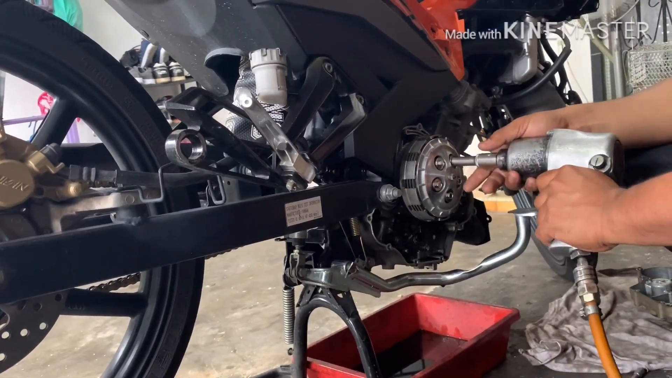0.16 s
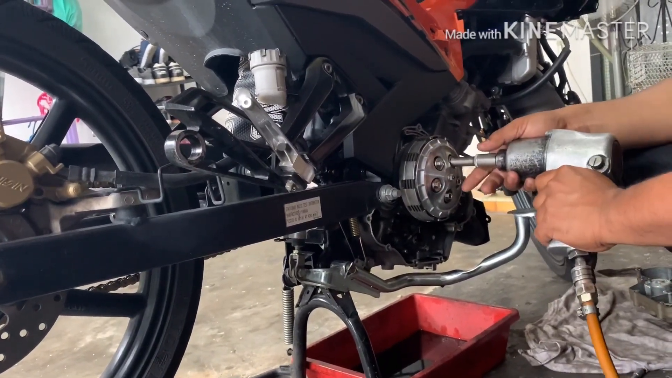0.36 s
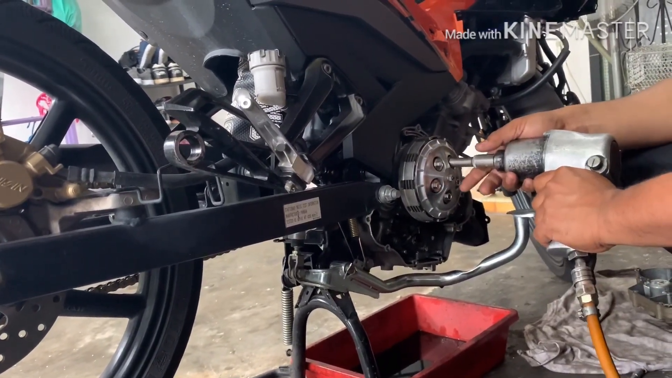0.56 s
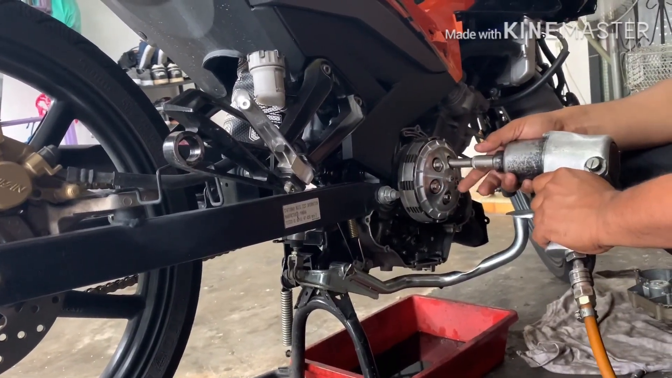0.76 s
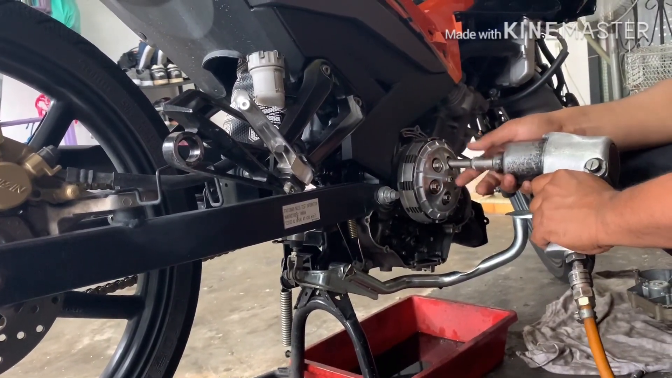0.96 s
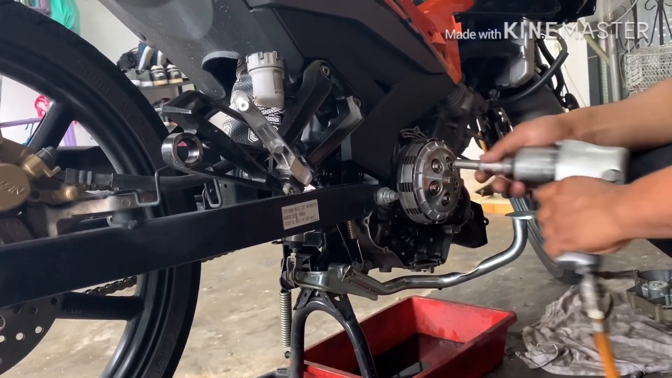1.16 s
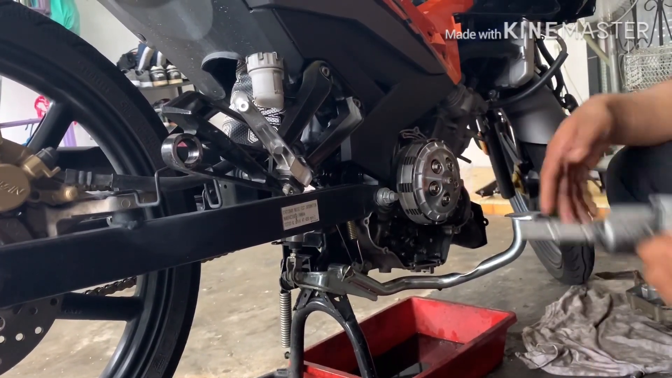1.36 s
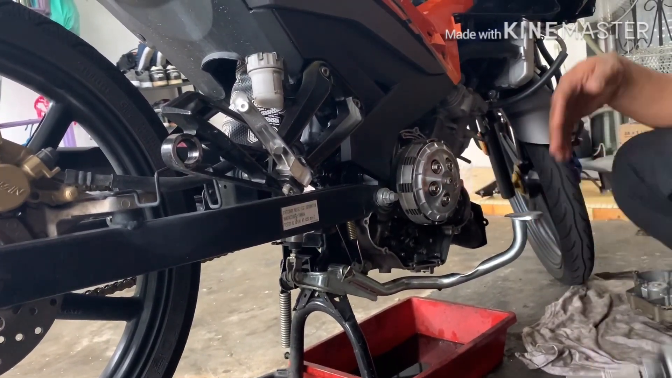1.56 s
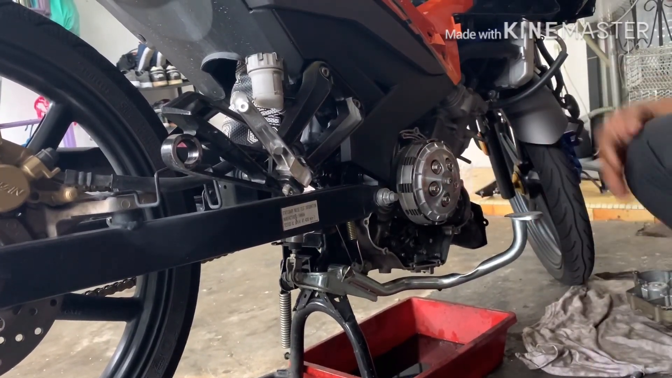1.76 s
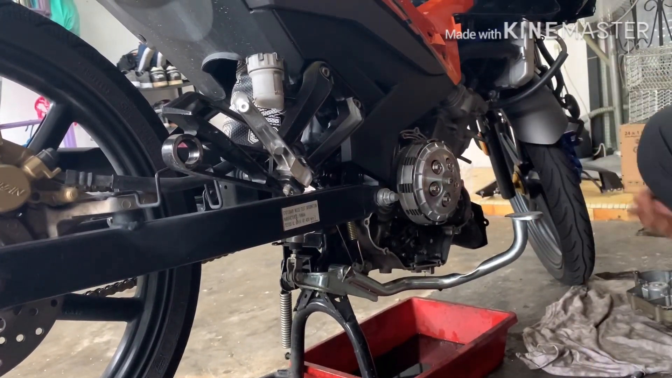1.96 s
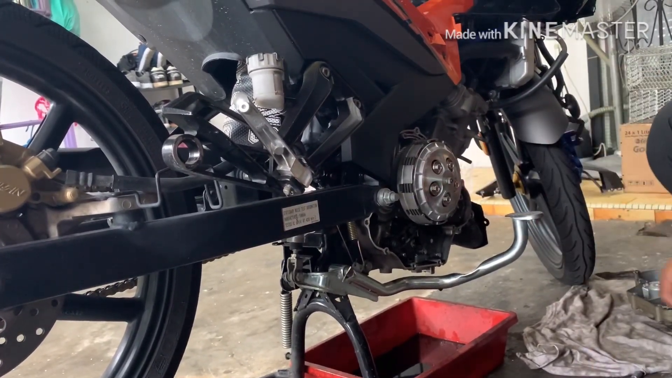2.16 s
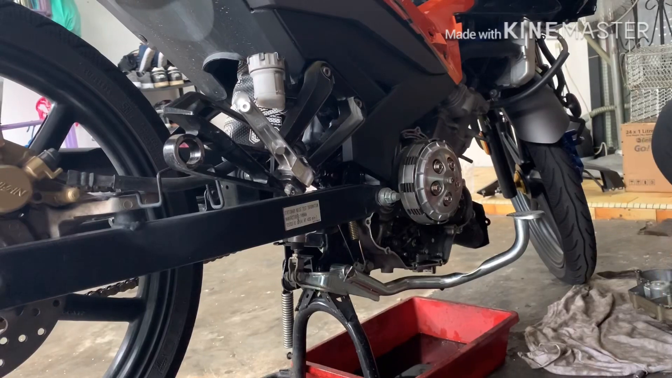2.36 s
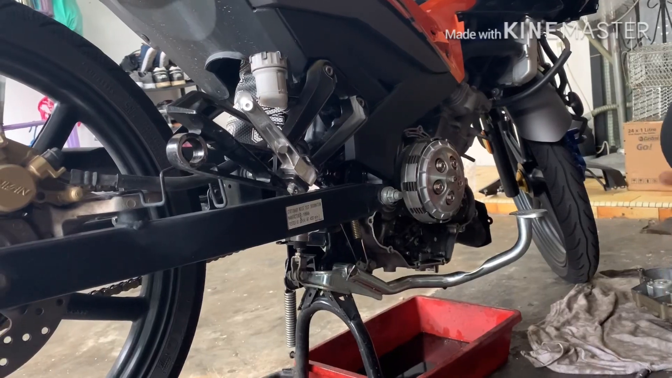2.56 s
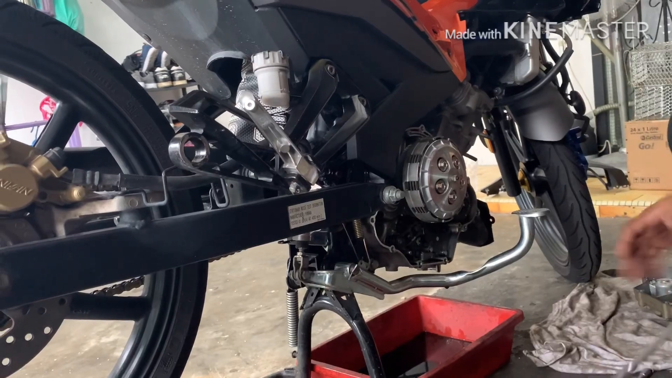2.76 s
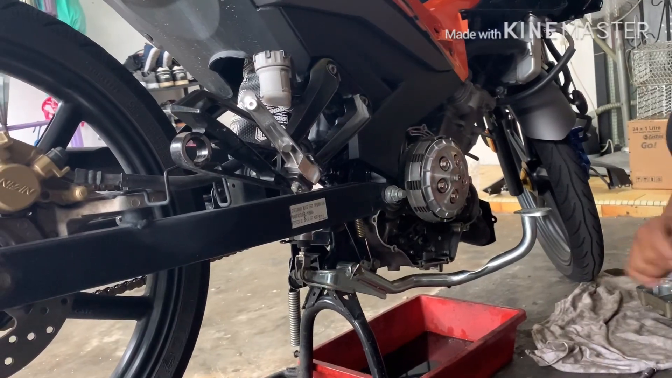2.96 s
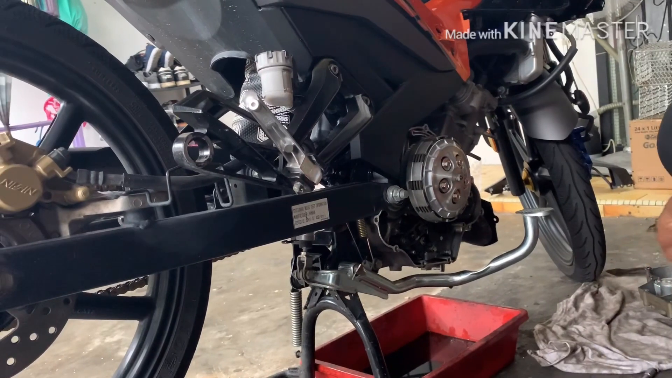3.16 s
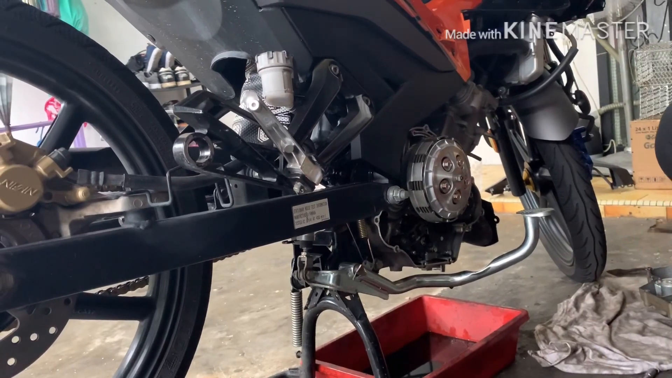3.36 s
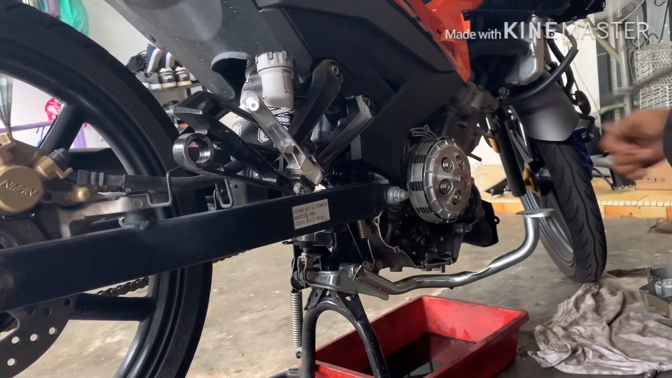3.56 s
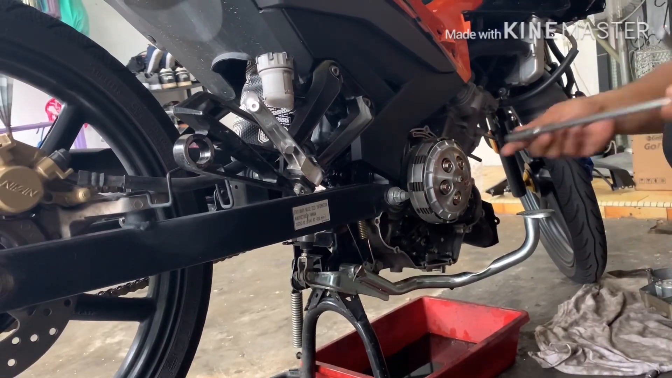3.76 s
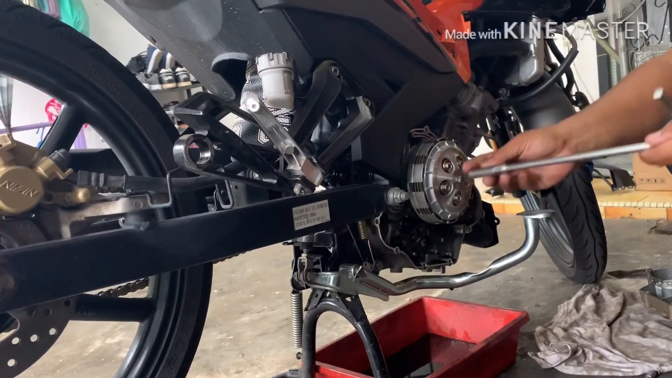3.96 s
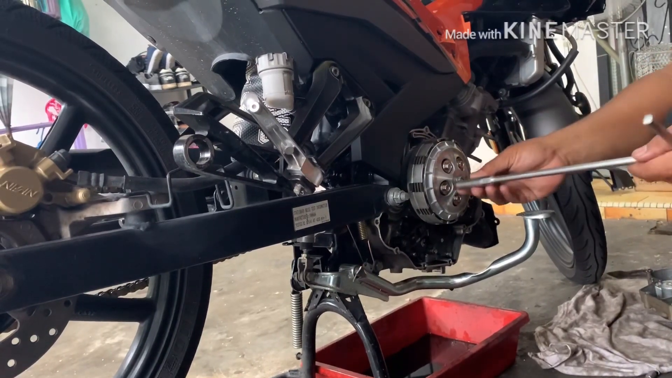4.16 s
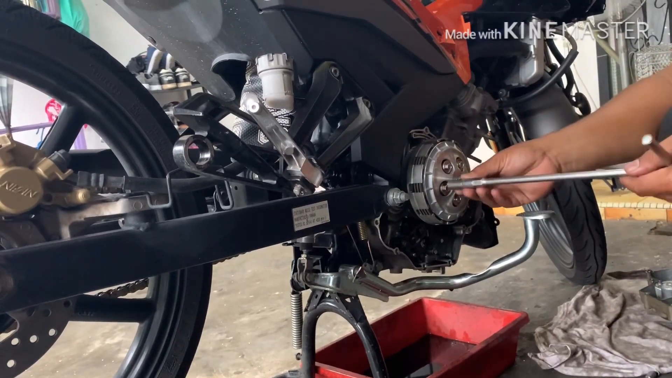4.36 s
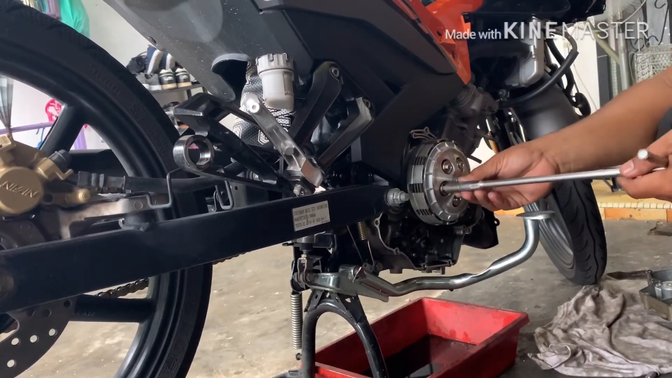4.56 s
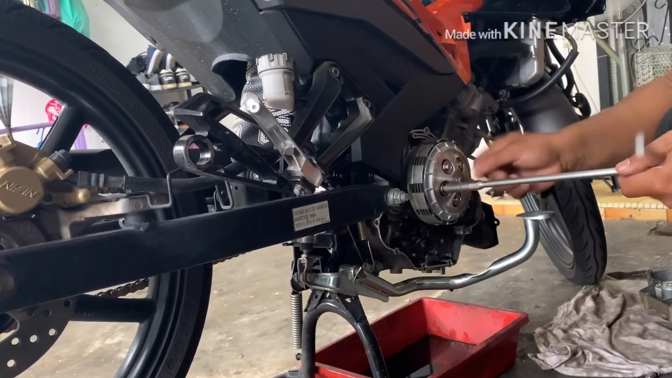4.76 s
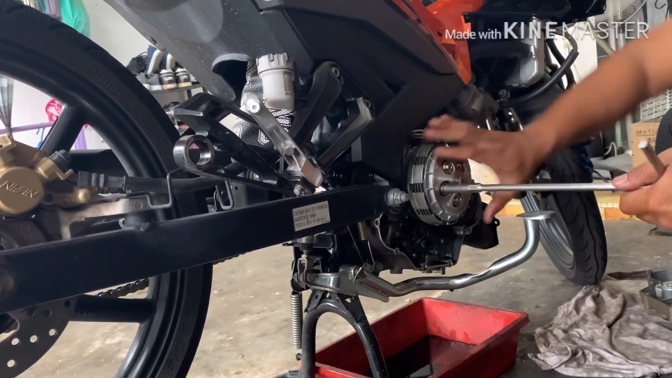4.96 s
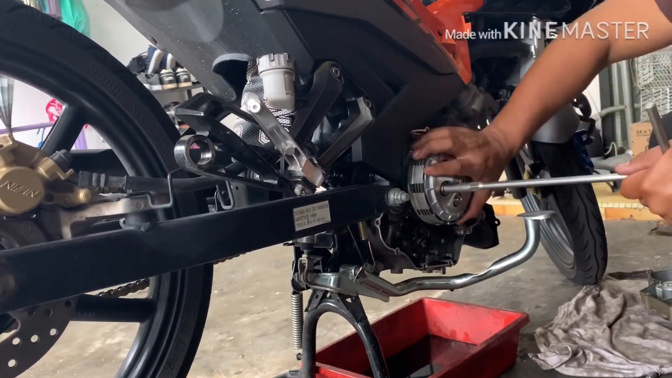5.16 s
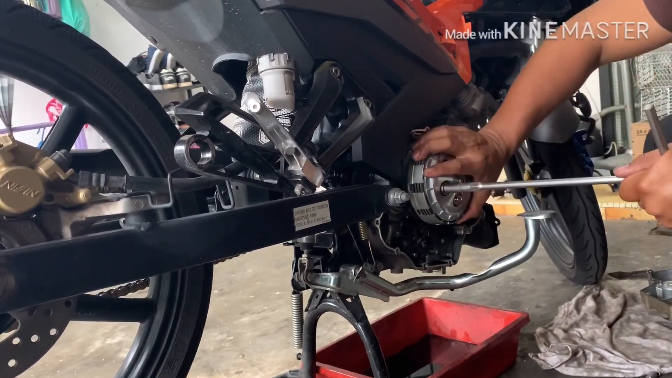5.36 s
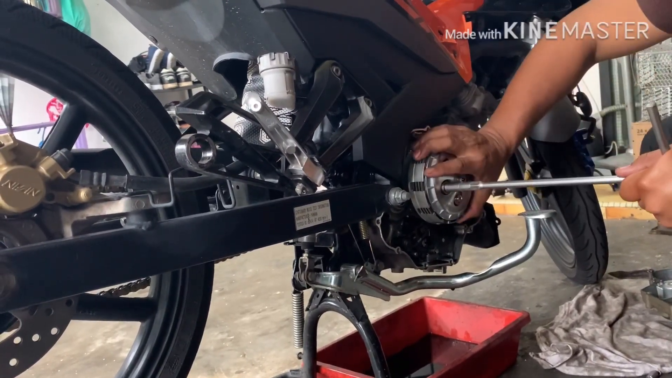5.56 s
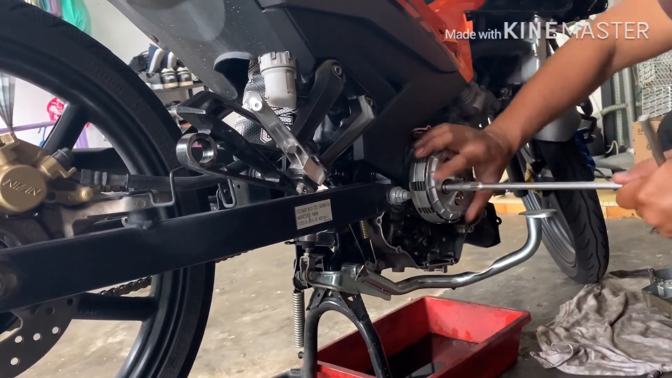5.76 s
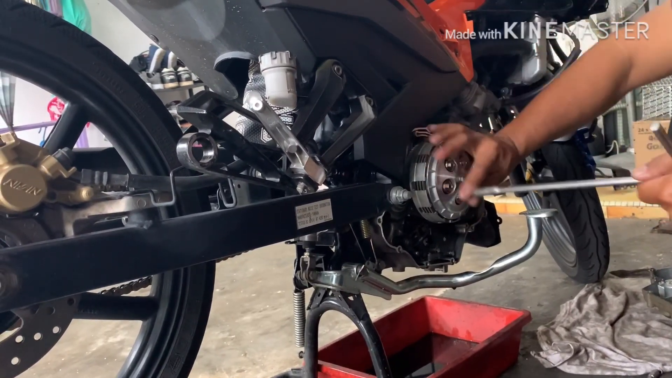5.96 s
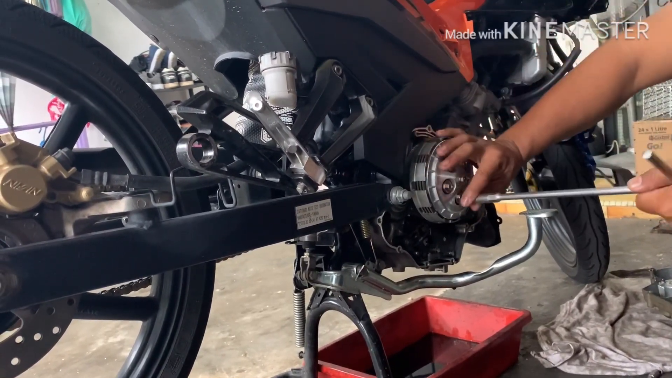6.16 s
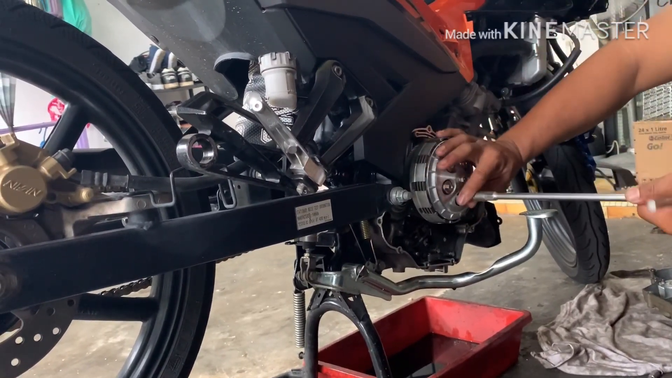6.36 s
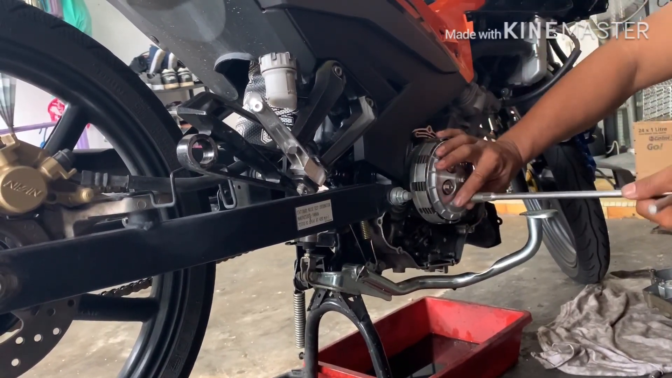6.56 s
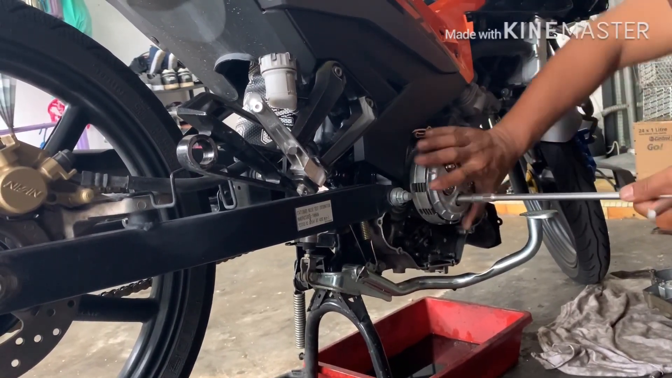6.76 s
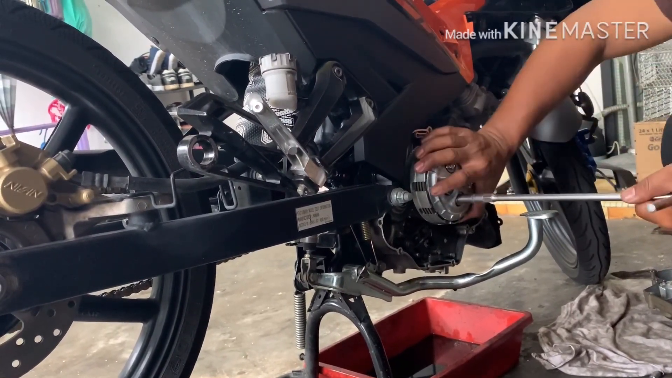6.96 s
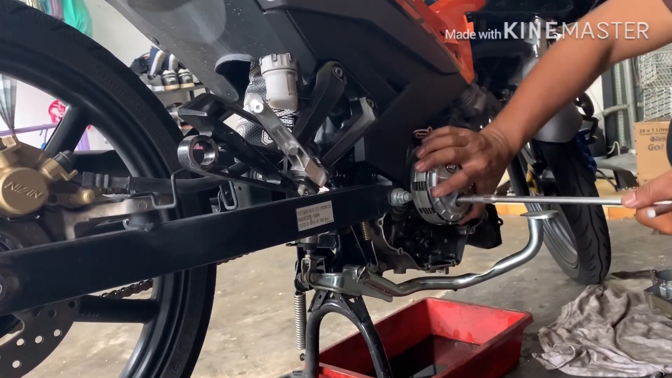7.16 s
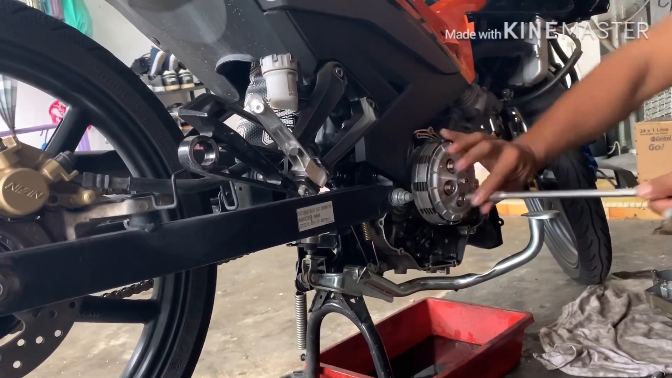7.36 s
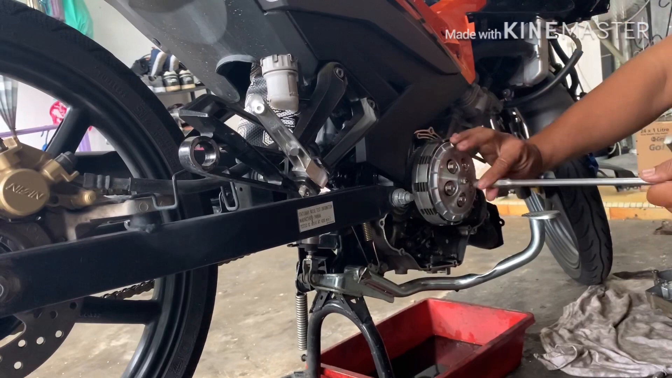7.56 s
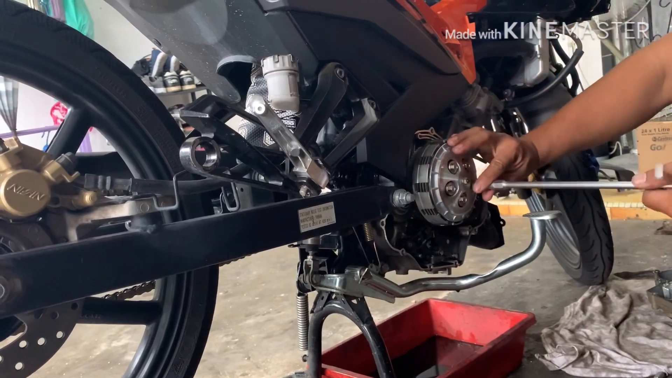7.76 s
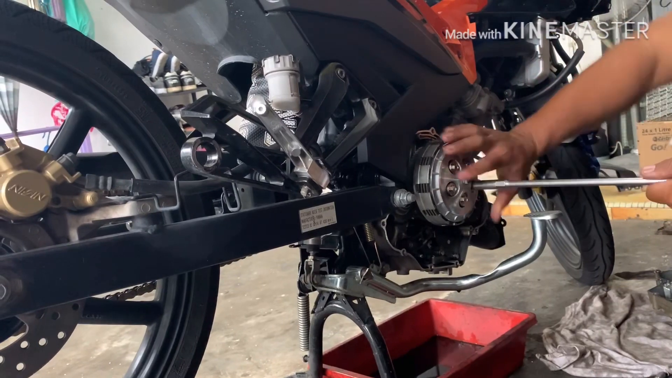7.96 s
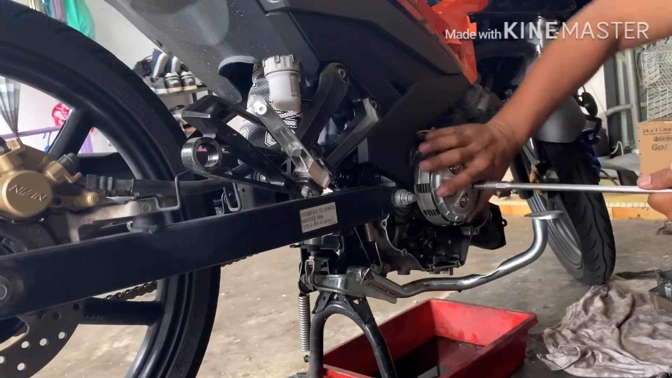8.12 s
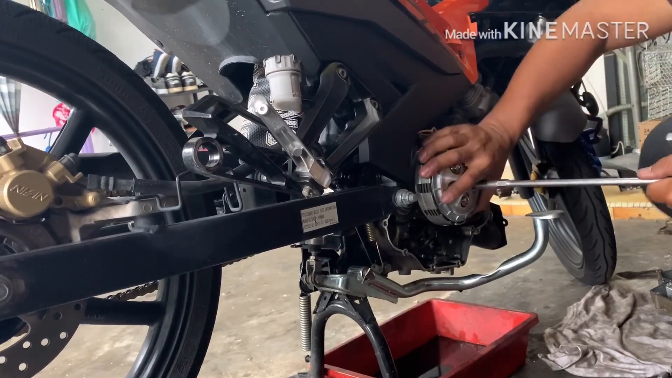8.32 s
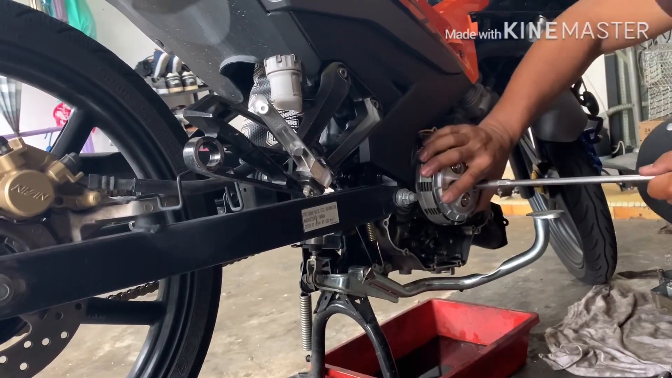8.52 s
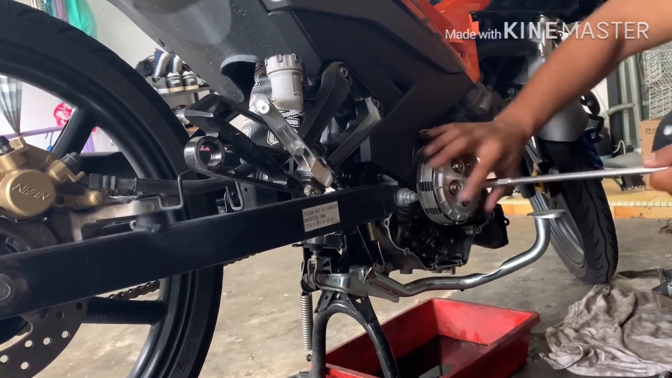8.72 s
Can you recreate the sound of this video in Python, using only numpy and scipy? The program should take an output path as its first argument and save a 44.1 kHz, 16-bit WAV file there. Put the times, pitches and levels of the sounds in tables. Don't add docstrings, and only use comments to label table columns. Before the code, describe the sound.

An air wrench hisses and rattles for a second, clunks onto concrete, then a hand tool scrapes and clicks on metal while sparrows chirp.

```python
import sys
import numpy as np
from scipy import signal
from scipy.fft import rfft, irfft, next_fast_len
from scipy.io import wavfile
from scipy.ndimage import uniform_filter1d

SR = 44100
rng = np.random.default_rng(int(sys.argv[2]) if len(sys.argv) > 2 else 0)


def makeup_ratio(level_db):
    decades = np.asarray(level_db, float) / 20
    return 10 ** decades


def store_wav(level_fs):
    pcm = np.round(np.clip(np.atleast_2d(level_fs), -1, 1) * 32767)
    wavfile.write(sys.argv[1], SR, pcm.T.astype(np.int16))


N = 392049
T = np.arange(N) / SR
F = np.maximum(np.arange(N // 2 + 1) * SR / N, 1)
TRIGGER_OFF_S = 0.9324

# mode_hz, level_db, t60_s
WRENCH_MODES = [(189.8, 4.5, 0.042), (334, -1, 0.019), (430.05, -1.5, 0.048), (590.6, 0, 0.11),
                (786, 3, 0.015), (986, -6, 0.048), (2680, 4, 0.045), (3560, -1.5, .03), (6620, 0, 0.019),
                (7170, 3, 0.047), (12800, -11.5, 0.049)]


def unit(x):
    return x / np.sqrt(np.mean(x ** 2))


def colour(x, table):
    hz, db = np.transpose(table)
    edge = np.minimum(F / hz[0], 1) ** 4 * np.minimum(hz[-1] / F, 1) ** 8
    gain = makeup_ratio(np.interp(np.log(F), np.log(hz), db)) * edge
    return unit(irfft(rfft(x) * gain, N))


def resonate(x, peaks):
    response = 0
    for k, (hz, width, db) in enumerate(peaks):
        response = response + (-1) ** k * makeup_ratio(db) / (1 + 1j * (F - hz ** 2 / F) / width)
    return unit(irfft(rfft(x) * response, N))


def band(x, lo_hz, hi_hz):
    sos = signal.butter(2, [lo_hz, min(hi_hz, .45 * SR)], "band", fs=SR, output="sos")
    return signal.sosfilt(sos, x)


def walk(rate):
    k = int(SR / rate)
    levels = np.repeat(rng.standard_normal(N // k + 1), k)
    return unit(uniform_filter1d(levels, k)[:N])


def grains(rate, spread_db):
    present = rng.random(N) < rate / SR
    size = rng.standard_normal(N).clip(-2, 2)
    return present * size * makeup_ratio(spread_db * rng.exponential(size=N).clip(0, 2))


def held(s, length, in_db_per_s, out_db_per_s):
    return -in_db_per_s * np.maximum(s - T, 0) - out_db_per_s * np.maximum(T - s - length, 0)


def ring(modes, t, stretch=1):
    out = 0
    for hz, db, t60 in modes:
        tone = np.sin(2 * np.pi * (hz * t + rng.random()))
        out = out + makeup_ratio(db) * tone * 1000. ** (-t / (t60 * stretch))
    return out


def add(out, s, x):
    i = int(s * SR)
    out[i:i + len(x)] += x[:N - i]


def wrench():
    # frequency_hz, level_db
    exhaust = [(4500, -16.5), (6400, -3.5), (7600, -10), (8800, 0), (10200, 2), (11400, -3), (14200, -0.5),
               (15600, -1.5)]
    # frequency_hz, width_hz, level_db
    hiss_peaks = [(6700, 140, -10.5), (7153, 78, 8.5), (9280, 490, 6.5), (9640, 210, 5), (9800, 180, -11),
                  (10480, 90, 2), (10900, 120, -2), (14750, 150, -3)]
    # frequency_hz, width_hz, level_db
    casing_peaks = [(383, 180, 0), (499.4, 220, 0.5), (680, 200, -0.5), (801.3, 150, 1), (985, 150, 1)]
    # frequency_hz, width_hz, level_db
    rumble_peaks = [(135.2, 45, 8.5), (202, 80, 7), (257, 70, 7.5), (335, 52, 5.5), (410, 90, 0)]
    # frequency_hz, width_hz, level_db
    rattle_peaks = [(1350, 280, 1), (1600, 590, 7), (1824, 180, 1), (2120, 300, 5), (2478, 310, 9),
                    (2900, 470, 6.5), (3600, 280, 16.5)]
    # start_s, held_s, level_db
    surges = [
        (0, 0.03, 3.5),
        (0.119, 0.061, 4.5),
        (.236, 0.037, 5),
        (.357, 0.076, 2.5),
        (.55, 0.02, 0.5),
        (.63, .06, 2),
        (.875, .045, 3),
    ]
    rotor_hz = 102.54
    wrench_db, spin_down_db_per_s = -23, 411.5
    coast_db_per_s = 204.5
    valve_s, valve_db, valve_db_per_s = 1.0275, -32.5, 400.5
    casing_db, rumble_db, rattle_db, hose_db = -23, -23, -18, -43

    air_gain = makeup_ratio(wrench_db + held(0, TRIGGER_OFF_S, 0, spin_down_db_per_s))
    air_gain = air_gain + makeup_ratio(valve_db + held(valve_s, 0, 9000, valve_db_per_s))
    parts_gain = makeup_ratio(wrench_db + held(0, TRIGGER_OFF_S, 0, spin_down_db_per_s - coast_db_per_s))
    turn = np.cumsum(rotor_hz * (1 + .08 * walk(45))) / SR

    puff = 1 + 0.25 * np.cos(4 * np.pi * turn) + 0.11 * np.cos(2 * np.pi * turn)
    jet = rng.standard_normal(N) * puff * makeup_ratio(1.0 * walk(300)) + 1.9 * grains(1531.5, 2.51)
    air = unit(colour(jet, exhaust) + 0.47 * resonate(jet, hiss_peaks))

    slap = np.exp(-(turn % 1) / 0.24) * makeup_ratio(2.6 * walk(60))
    vanes = 13.94 * np.diff(np.floor(turn), prepend=0) * makeup_ratio(2.8 * walk(90))
    surge = 1.0
    for s, length, db in surges:
        surge = surge + makeup_ratio(db + held(s, length, 499, 499))
    casing = unit(surge * resonate(vanes + 0.904 * slap * rng.standard_normal(N), casing_peaks))

    throb = rng.standard_normal(N) * makeup_ratio(1.8 * walk(25))
    rumble = colour(resonate(throb, rumble_peaks), [(95, 0.00025), (460, 0)])
    hose = colour(rng.standard_normal(N), [(45, -9.0), (70, 2.0), (100, -8.0)])
    shake = (0.48 + slap) * rng.standard_normal(N) + 3.4 * grains(300, 2.0)
    rattle = unit(sum(makeup_ratio(peak[2] + 2.9 * walk(15.0)) * resonate(shake, [peak]) for peak in rattle_peaks))

    parts = makeup_ratio(casing_db) * casing + makeup_ratio(rumble_db) * rumble
    parts = parts + makeup_ratio(hose_db) * hose + makeup_ratio(rattle_db) * rattle
    return air_gain * air + parts_gain * parts


def hits(events, modes, t60_s, ring_db, tick_db, low_hz, split_hz):
    out, t = np.zeros(N), np.arange(SR // 4) / SR
    rise = np.minimum(t / 0.00099, 1)
    edges = [(low_hz, 600), (600, split_hz), (split_hz, 8900), (8600, 16500)]
    for s, db, thud_db, hard_db, *glint_db in events:
        t60 = np.clip(t60_s * makeup_ratio(0.12 * hard_db), .01, .3)
        decay = 1000. ** (-t / t60) + 1.7 * np.exp(-t / 0.0027)
        crack = rng.standard_normal(len(t)) * decay * rise
        body = makeup_ratio(ring_db) * ring(modes, t, t60 / 0.13) * rise
        levels_db = [thud_db, 0, hard_db, hard_db + tick_db + sum(glint_db)]
        blow = 0
        for edge, level_db in zip(edges, levels_db):
            part = band(crack + body, *edge)
            blow = blow + makeup_ratio(db + level_db) * part / np.abs(part).max()
        add(out, s - .001, blow)
    return out


def hammer_clacks():
    # start_s, level_db, thud_rel_db, hardness_rel_db
    clacks = [(0.005, -28.5, -6, -7.5), (0.117, -28.5, -7, -8.5), (0.155, -29, -10, -8),
              (0.244, -29, -9.5, -7.5), (0.357, -30, 0, -8), (0.511, -31.5, 5.5, -0.5),
              (0.527, -35, 7.5, -4), (0.572, -32.5, -5, -2), (0.632, -30.5, 3, -2), (0.684, -29, 0, 5),
              (0.745, -33, 6.5, -3), (0.797, -27, -4, 8), (0.811, -30, -1, -0.5), (0.848, -33, 0, -3),
              (0.897, -27, -6.5, 0.5), (0.912, -30.5, -2, -2.5)]
    return hits(clacks, WRENCH_MODES, 0.086, -9.0, -22.5, 80, 1400)


def floor_knocks():
    # start_s, level_db, weight_rel_db, hardness_rel_db, glint_rel_hardness_db
    knocks = [(1.028, -25.5, -4, 1, -4), (1.140, -50, -6.5, 7, 7), (1.1954, -62.5, -9.5, 2.5, 15),
              (1.2233, -61.5, -16, 5.5, 17), (1.651, -42.5, 0, -9.5, -1), (1.7613, -21, -4, -5, 4.5),
              (1.778, -50, 4, -14, 2), (1.791, -41, 2.5, -10, 0), (1.8022, -47.5, 6, 5, 16.5),
              (1.83, -49, 4, -12, 0), (1.8775, -42, 8.5, -6, 6), (1.915, -45, -10, 5, -11),
              (1.9259, -23.5, -0.5, 10, -5), (1.944, -30.5, 3, -24, -2.5), (1.9588, -38, 2, 7, 7),
              (1.970, -36, 5.5, 8.5, -9.5)]
    return hits(knocks, WRENCH_MODES, 0.036, 1.0, 0.502, 132.8, 1420)


def socket():
    # mode_hz, level_db, t60_s
    socket_modes = [(4980, -28.5, 1.4), (6970, 1, 0.261), (7504, -14, 0.72), (7570, -11, 0.608),
                    (10090, -26, 0.28), (10600, -7, 0.35), (10980, -11.5, 1.2), (11700, -34.5, 0.25),
                    (14600, 10.5, 0.31), (14930, -1.5, 0.41)]
    out, t = np.zeros(N), np.arange(SR // 3) / SR
    shape = np.minimum(t / 0.048, 1) * np.clip((.24 - t) / 0.031, 0, 1)
    add(out, 1.958, makeup_ratio(-32.5) * ring(socket_modes, t) * shape)
    return out


def coupler():
    # start_s, level_db, weight_rel_db, hardness_rel_db, glint_rel_hardness_db
    contacts = [
        (2.4135, -48.5, -13.5, 18.8, 5.5),
        (2.4275, -56, -16, 19, -13),
        (2.437, -49, -12, 14, -20),
        (2.4455, -54.5, -14, 18.7, -16),
        (2.459, -65, -12, 16, 9),
    ]
    # mode_hz, level_db, t60_s
    coupler_modes = [(5300, 5.5, 0.019), (6210, 2, 0.033), (10320, -3, 0.0565), (11820, -13, 0.094),
                     (15020, -12.5, 0.072)]
    return hits(contacts, coupler_modes, 0.17, -2.13, -1.54, 210, 3160)


def driver_clicks():
    # start_s, level_db, weight_rel_db, hardness_rel_db
    clicks = [(2.693, -49.5, -24.5, -18), (4.348, -40, -5, -19.5), (4.466, -47.5, -5, 3.5),
              (4.735, -39, -2.5, 7.5), (4.747, -32.5, -9.5, 9), (5.013, -48, -17.5, -19),
              (5.073, -41.5, -2.5, -29.5), (5.732, -41, -9, -0.5), (5.777, -43.5, -23.5, 8.5),
              (5.819, -40.5, -22.5, 2.5), (6.19, -49, -1, -20.5), (6.385, -34.5, -30, 7.5),
              (6.395, -29.5, -9, 1), (6.513, -40.5, -30, -13), (7.316, -50.5, -8, -25),
              (7.621, -30.5, -20, 4), (7.658, -28, -7.5, 0.5), (7.753, -39.5, -7, -3.5),
              (7.812, -49, 6, -22), (7.917, -46, -5, -21), (8.139, -50.5, -13, 2), (8.649, -45, -10, -1),
              (8.679, -36.5, -8.5, 5)]
    # mode_hz, level_db, t60_s
    driver_modes = [(1659, 10, 0.034), (2270, 11, 0.019), (2770, 2.5, 0.055), (4487, -2, 0.024),
                    (6704, 0.5, 0.042), (7753, 14.5, 0.01), (9970, 8.5, 0.073), (11970, 5, 0.05),
                    (15500, -38.5, .03)]
    return hits(clicks, driver_modes, 0.1, 1.0, -7, 167, 2500)


def scrape():
    # start_s,
    # peak_db, resonance_hz, length_s
    drags = [(3.166, -56, 1950, 0.053), (3.242, -54, 2900, 0.02), (3.32, -55, 3300, .03),
             (3.307, -52, 1050, 0.0416), (3.405, -54.5, 2010, 0.06), (3.606, -59, 1050, 0.034),
             (4.081, -53, 1860, 0.11), (4.112, -43.5, 1420, 0.068), (4.327, -50, 1750, 0.097),
             (4.355, -48.5, 1400, 0.1), (4.488, -42.5, 1378, 0.074), (4.638, -49.5, 1785, 0.14),
             (4.664, -42.5, 1397, 0.078), (4.814, -43, 1540, 0.079), (4.887, -57, 1530, 0.048),
             (4.938, -49.5, 1325, 0.039), (5.001, -40.5, 1390, 0.08), (5.18, -46, 1960, 0.099),
             (5.216, -42, 1400, 0.048), (5.253, -56, 2110, 0.05), (5.447, -49, 1694, 0.027),
             (5.633, -51.5, 1190, 0.04), (6.274, -51, 1386, 0.052), (6.704, -51, 1790, 0.11),
             (6.833, -51, 2070, 0.14), (7.792, -50.5, 1300, 0.17), (8.053, -63, 1630, 0.14),
             (4.74, -46.5, 618, 0.045), (4.737, -53, 2650, .035), (4.81, -49, 3800, .05),
             (4.83, -50, 4800, .05), (5.005, -43, 3580, 0.032), (5.235, -53, 3290, 0.059),
             (5.2, -53, 3880, 0.027)]
    # multiple, level_db
    slip_harmonics = [(1, 4.5), (2, -8.5), (3, -17)]
    bright_db, slip_db, slip_wobble = -5, -8, 0.4
    out, t = np.zeros(N), np.arange(SR // 4) / SR
    for s, db, hz, length in drags:
        grip, waver, rub = rng.standard_normal((3, len(t)))
        shape = np.minimum(t / 0.0049, 1) * np.exp(-(t / max(length, .02)) ** 2)
        drag = rub * makeup_ratio(20.0 * uniform_filter1d(grip, size=60)) * shape
        phase = 2 * np.pi * np.cumsum(hz * (1 + slip_wobble * uniform_filter1d(waver, size=150))) / SR
        slip = sum(makeup_ratio(d) * np.sin(k * phase) for k, d in slip_harmonics)
        slip = slip * shape * makeup_ratio(60.0 * uniform_filter1d(grip, size=250))
        main = band(drag, 0.923 * hz, 1.08 * hz) + 0.41 * band(drag, 990, 2220)
        upper = 2.1 * band(drag, 1860, 3000) + 1.35 * band(drag, 2760, 3980) + 0.23 * band(drag, 4200, 4700)
        layers = [(0, main), (bright_db, upper), (slip_db, slip)]
        add(out, s - .004, makeup_ratio(db - 1.5) * sum(makeup_ratio(d) * x / np.abs(x).max() for d, x in layers))
    return out


def rustle():
    # start_s, held_s, level_db, brightness_rel_db
    movements = [(1.07, 0.021, -59, 6), (1.25, 0.38, -82.5, 8.5), (1.645, 0.065, -77, -2.5),
                 (1.77, 0.25, -73, 6), (1.941, 0.041, -58, -7.5), (2.58, 0.098, -75.5, -5),
                 (3.15, 0.013, -65, -36), (3.2, 0.22, -67, -4.5), (3.55, 0.12, -73.5, -29.5),
                 (5.82, 0.12, -67, -10), (6.201, 0.3, -70.5, -33.5), (6.55, 0.027, -70, -12.5),
                 (6.7, 0.4, -66, -21), (7.15, 0.22, -66.5, -25), (7.35, 0.15, -74.5, -33.5),
                 (7.69, 0.0084, -58.5, -9), (7.8, 0.158, -81, -33.5), (8.05, 0.17, -66.5, -11),
                 (8.3, 0.26, -76, -31.5), (8.62, 0.074, -63.5, -8), (8.75, 0.124, -71.5, -27.5)]
    rub = grains(900, 4.0) * makeup_ratio(2.5 * walk(40))
    dull = makeup_ratio(2.0 * walk(35)) * colour(rub, [(500, 3.5), (1000, -2), (2000, 0.0), (3500, -3.0)])
    bright = colour(rub, [(3500, -14.5), (7000, -9.5), (10000, -7.0), (15500, -12.0)])
    out = 0
    for s, length, db, bright_db in movements:
        out = out + makeup_ratio(db + held(s, length, 250, 120)) * (dull + makeup_ratio(bright_db) * bright)
    return out


def chirps():
    # start_s, length_s, start_hz, level_db
    sweeps = [(2.107, 0.0198, 3500, -64), (2.174, 0.0313, 4980, -66), (2.842, 0.018, 4220, -65.5),
              (2.947, 0.058, 5770, -69), (3.492, 0.021, 4760, -63), (3.614, 0.047, 5550, -69),
              (5.453, 0.0348, 4850, -78), (5.565, 0.05, 5770, -67.5), (5.885, 0.051, 5300, -65),
              (6.013, 0.029, 5370, -61.5), (6.417, 0.024, 4500, -61), (6.512, 0.029, 5556, -57),
              (6.87, 0.029, 5030, -70), (7.05, 0.05, 5270, -73), (7.209, 0.0336, 4380, -62),
              (7.559, 0.028, 4410, -61), (8.238, 0.0184, 4040, -69), (8.554, 0.029, 4380, -62),
              (8.844, 0.028, 4500, -66.5)]
    # start_s, length_s, pitch_hz, sag_share, level_db
    held_notes = [(1.345, 0.088, 5675, 0.15, -66.5), (2.225, 0.038, 5670, 0.0096, -70),
                  (2.578, 0.032, 5590, -0.0014, -72), (2.646, 0.09, 3600, 0.089, -70),
                  (2.76, 0.11, 5740, 0.27, -75), (3.15, 0.042, 904, 0.16, -56),
                  (2.599, .075, 1753, 0, -63.5), (3.031, .045, 1745, 0, -64.5),
                  (3.125, 0.019, 1780, 0, -62.5), (3.22, 0.029, 5165, 0.0015, -75),
                  (3.535, 0.029, 4927, -0.00082, -66.5), (4.365, 0.025, 4480, 0.00034, -64),
                  (7.885, 0.022, 4200, -.18, -69), (7.982, 0.022, 4300, 0.12, -65),
                  (8.055, 0.087, 1600, 0.055, -64.5), (8.417, 0.014, 3740, -.2, -66),
                  (7.185, 0.021, 532.5, 0.1, -56), (3.475, 0.049, 4910, -0.00087, -64),
                  (6.964, 0.029, 3330, -0.011, -60), (7.316, 0.024, 3366, 0.26, -58),
                  (7.542, 0.1, 787.3, 0.025, -58.5), (7.679, 0.21, 750, 0.02, -65.5),
                  (7.98, 0.2, 734, 0.03, -66), (8.551, 0.34, 699.8, 0.029, -71),
                  (7.865, 0.029, 3913, -0.023, -62), (8.105, 0.064, 3200, 0.15, -65),
                  (8.39, .04, 3978, 0.1, -66.5)]
    # start_s, length_s, pitch_hz
    squeak_steps = [
        (8.74, .05, 1742),
        (8.797, 0.093, 1665),
    ]
    # multiple, level_db
    squeak_harmonics = [(1, -61), (2, -68), (3, -74)]
    end_hz, squeak_sag = 3380, 0.033
    calls = [(s, length, hz, 1 - end_hz / hz, db) for s, length, hz, db in sweeps]
    calls += held_notes
    for s, length, hz in squeak_steps:
        calls += [(s, length, k * hz, squeak_sag, db) for k, db in squeak_harmonics]
    out = np.zeros(N)
    for s, length, start_hz, sag, db in calls:
        u = np.linspace(0, 1, int(length * SR))
        hz = start_hz * (1 - sag * u ** 1.4)
        shape = np.abs(np.sin(np.pi * u)) ** 0.055
        add(out, s, makeup_ratio(db) * shape * np.sin(2 * np.pi * np.cumsum(hz) / SR))
    return out * makeup_ratio(-2 + 2.5 * walk(150) + 2.5 * walk(25))


def machine():
    # time_s, level_db
    load = [
        (0.9, -66),
        (1.9, -59),
        (2.6, -59.5),
        (3.8, -58.5),
        (4.7, -65.5),
        (5.9, -62),
        (7.6, -63.5),
        (8.2, -55),
        (8.89, -56),
    ]
    pitches = [117.9, 138, 289.6]
    low_db = np.interp(T, *np.transpose(load))
    neighbour_db = -73.5 + 2 * T
    high_db = -64.5 + 1.0652 * T
    tones = 0
    for hz, db in zip(pitches, [low_db, neighbour_db, high_db]):
        phase = 2 * np.pi * np.cumsum(hz * (1 + .006 * walk(5))) / SR
        tones = tones + makeup_ratio(db + 3.0 + 2 * walk(9)) * np.sin(phase)
    drone = colour(rng.standard_normal(N), [(45, -2.0), (70, 3.0), (100, -7.5)])
    return tones + makeup_ratio(-75 + 3.3 * walk(0.77)) * drone


def yard():
    # frequency_hz, level_db_per_hz
    murmur_spectrum = [(25, -22.5), (60, -1), (200, 3), (400, -9), (2500, -16.5), (6500, -31.5),
                       (13000, -38), (15700, -22.5)]
    out, t = np.zeros((2, N)), np.arange(SR // 16) / SR
    common = colour(rng.standard_normal(N), murmur_spectrum)
    apart = colour(rng.standard_normal((2, N)), murmur_spectrum)
    murmur = rfft(0.083 * common + 1.098 * apart)
    for hz in 30 * 2 ** np.arange(0, 9.6, .5):
        window = np.clip(1 - 2 * np.abs(np.log2(F / hz)), 0, 1)
        out += makeup_ratio(2.8 * walk(8)) * irfft(murmur * window, N)
    for when, pitch, size, glide in rng.random((170, 4)):
        hz = 500 * 9 ** pitch
        tone = np.sin(2 * np.pi * hz * t * (1 + 1.5 * (glide - .6) * t))
        peep = makeup_ratio(-5.5 - 9 * pitch + 2.3 * size) * np.hanning(len(t)) * tone
        add(out[0], when * T[-1], peep)
        add(out[1], when * T[-1], peep)
    return makeup_ratio(-59.5 + .5 * T + 1.0 * walk(2.3)) * out


def echo(x, scatter, t60, gap_s, dull):
    t = np.arange(SR // 2) / SR
    tail = scatter * 1000. ** (-t / t60) * np.clip(t / gap_s - 1, 0, 1)
    wave = rfft(tail)
    flat = wave / uniform_filter1d(np.abs(wave), size=40)
    tail = irfft(flat, len(t)) * 1000. ** (-t / (3 * t60))
    tail = signal.lfilter([1], [1, -np.clip(dull, 0, .9)], tail)
    tail = tail / np.sqrt(np.sum(tail ** 2, axis=1, keepdims=True))
    return signal.fftconvolve(x[None], tail, axes=1)[:, :N]


def indoors(x, near_scatter, shop_scatter):
    nearby = makeup_ratio(-1) * echo(x, near_scatter, 0.05, 0.00035, 0.39)
    shop = makeup_ratio(-12) * echo(x, shop_scatter, .34, 0.005, 0.82)
    return x + nearby + shop


def outdoors(x, near_scatter, far_scatter):
    early = echo(x, near_scatter, 0.029, 0.00078, 0.22)
    late = makeup_ratio(-5.5) * echo(x, far_scatter, .25, .01, 0.33)
    return makeup_ratio(-2.0) * x + early + late


def ports(x, table):
    # frequency_hz, left_minus_right_db
    balance = [(60, 3), (300, -1.5), (900, 3), (2400, 2), (5000, -2), (8000, 0.5)]
    n = next_fast_len(N + SR)
    left, right = rfft(x, n)
    f = np.maximum(np.arange(n // 2 + 1) * SR / n, 1)
    apart = (.22 + .78 / (1 + (330 / f) ** 5)) * (.2 + .8 / (1 + (f / 7300) ** 12))
    mid, side = (left + right) / 2, apart * (left - right) / 2
    turn = np.pi * np.interp(f, *np.transpose(table))
    linger = .5 * np.minimum(f / 6000, 1) ** 2 * np.sin(2 * turn)
    lead = np.exp(.5j * (turn - linger))
    hz, db = np.transpose(balance)
    tilt = makeup_ratio(np.interp(np.log(f), np.log(hz), db) / 2)
    top = 1 / (1 + (f / 15850) ** 120)
    both = np.array([(mid + side) * tilt / lead, (mid - side) / tilt * lead])
    return irfft(top * both, n)[:, :N]


def starve(x):
    # centre_hz, width_hz, share_of_time
    gaps = [(2500, 380, .4), (2700, 300, .12), (3130, 300, .12), (3300, 340, .4), (4100, 440, .2),
            (4330, 200, .15), (1480, 120, .12), (7750, 350, .75), (8050, 350, .9), (8500, 600, 1),
            (8900, 250, .75), (11400, 200, .25), (12750, 300, .45), (13400, 1050, 1)]
    n = int(1.1 * SR)
    head, f, out = rfft(x[:, :n].mean(axis=0)), np.arange(n // 2 + 1) * SR / n, x.copy()
    for hz, width, share in gaps:
        patches = np.repeat(rng.random(25) < share, 2)[rng.integers(2):]
        off = np.repeat(patches, 1024)[:n] * (T[:n] < TRIGGER_OFF_S)
        lost = irfft(head * (np.abs(f - hz) < width / 2), n)
        out[:, :n] -= uniform_filter1d(off * 1., size=450) * lost
    return out


def scene():
    # frequency_hz, half_turns
    tool_lead = [(400, 0), (800, -.6), (1150, -.35), (1550, -.75), (1900, -.35), (2450, -.75), (2850, -.6),
                 (3250, -.85), (3600, -.5), (4050, -.75), (4550, -.35), (5500, -.5), (6300, 0), (8350, 1),
                 (16000, 4)]
    # frequency_hz, half_turns
    floor_lead = [(400, 0), (750, -.7), (1080, -.4), (1600, -.8), (2000, -.8), (2500, -1.9), (3300, -2.8),
                  (5400, -3.4), (6300, -4), (8350, -3), (16000, 0)]
    # frequency_hz, half_turns
    hand_lead = [(400, 0), (1350, -.35), (2050, -.3), (3200, -.9), (4400, -.4), (5500, -.7), (6500, 0),
                 (8350, 1), (16000, 4)]
    near, shop, bird_near, bird_far = rng.standard_normal((4, 2, SR // 2))
    tool = wrench() + hammer_clacks()
    floor = floor_knocks() + socket()
    hands = coupler() + driver_clicks() + scrape() + rustle()
    outside = machine() + yard() + outdoors(chirps(), bird_near, bird_far)
    mix = ports(indoors(tool, near, shop), tool_lead)
    mix = mix + ports(indoors(floor, near, shop), floor_lead)
    return mix + ports(indoors(hands, near, shop) + outside, hand_lead)


def band_limit(x):
    return signal.sosfilt(signal.butter(12, 17020, fs=SR, output="sos"), x)


def record(dry):
    mix = starve(dry)
    return band_limit(mix)


dry = scene()
out = record(dry)
store_wav(out)
```